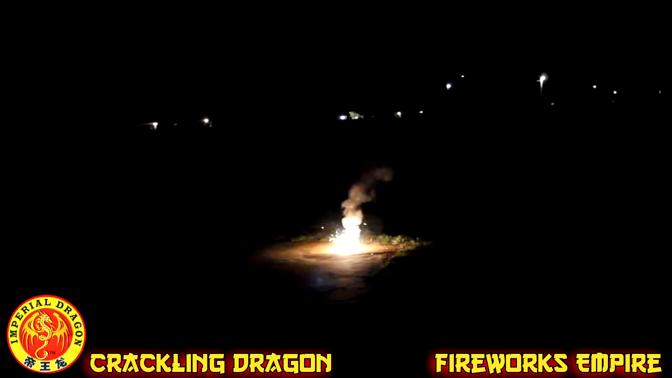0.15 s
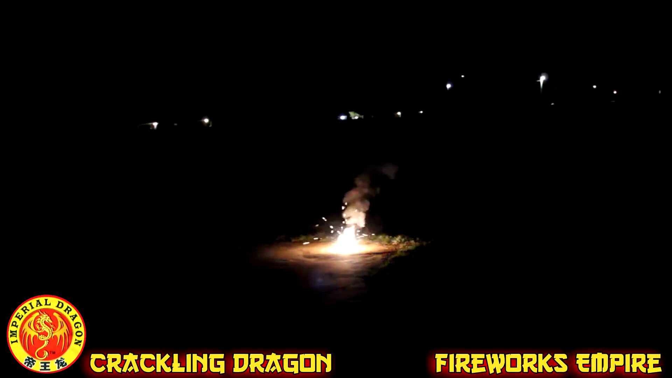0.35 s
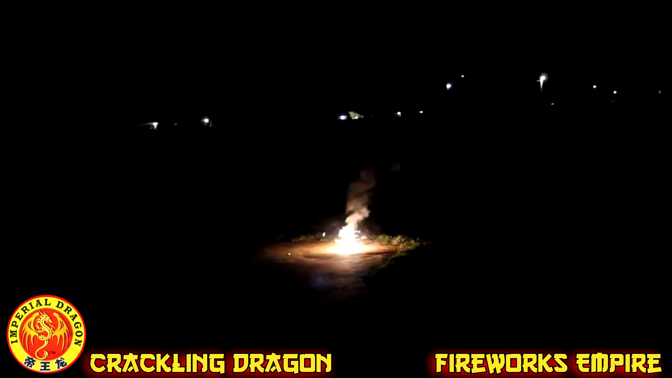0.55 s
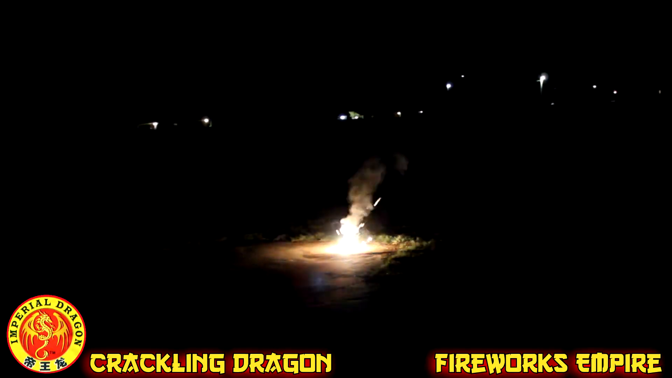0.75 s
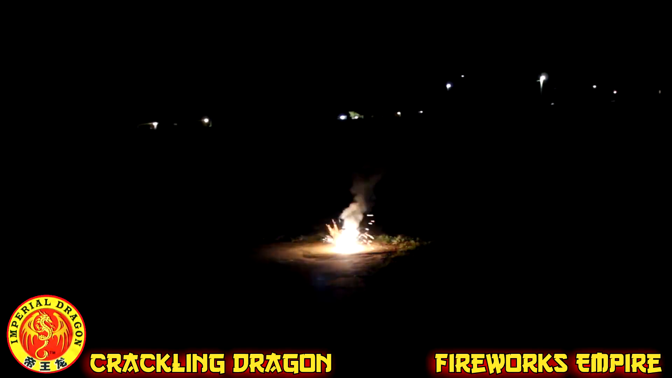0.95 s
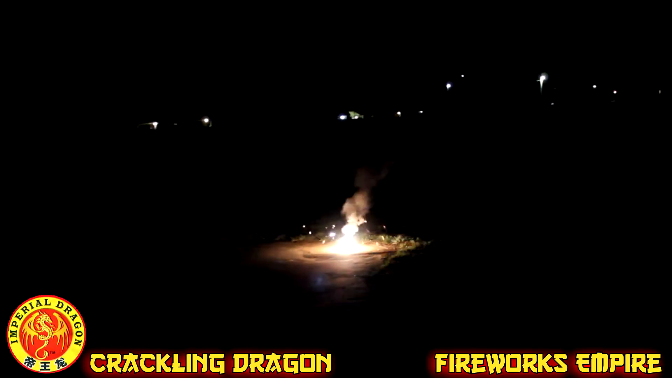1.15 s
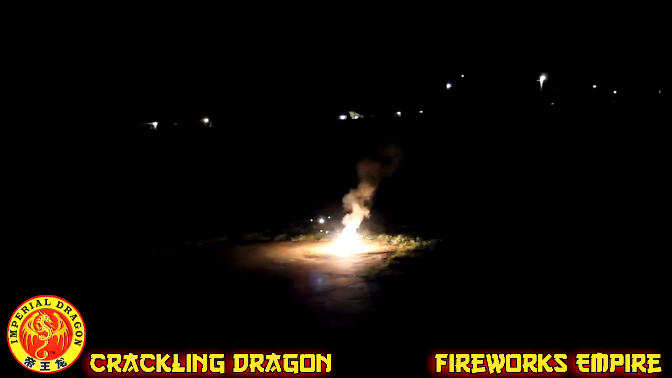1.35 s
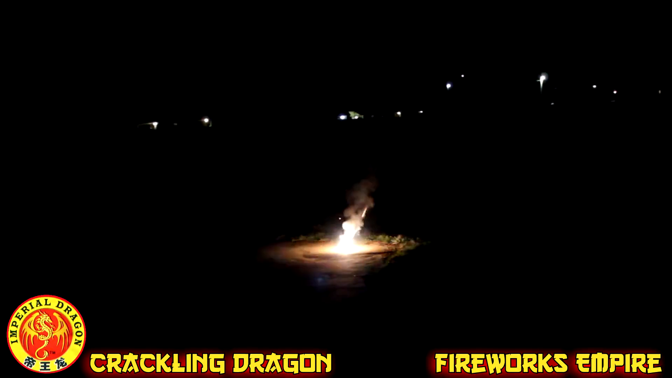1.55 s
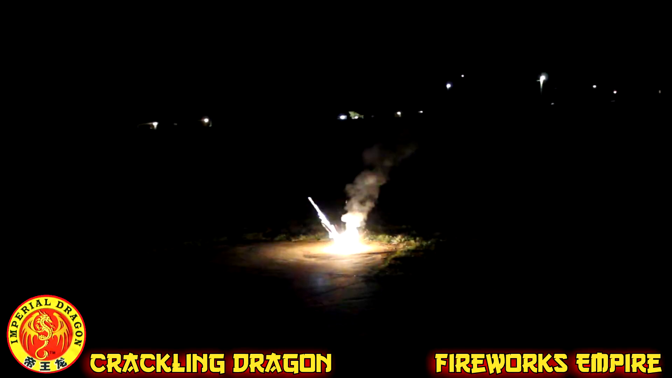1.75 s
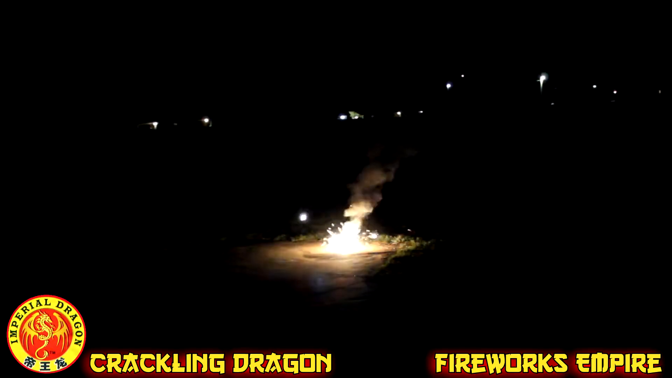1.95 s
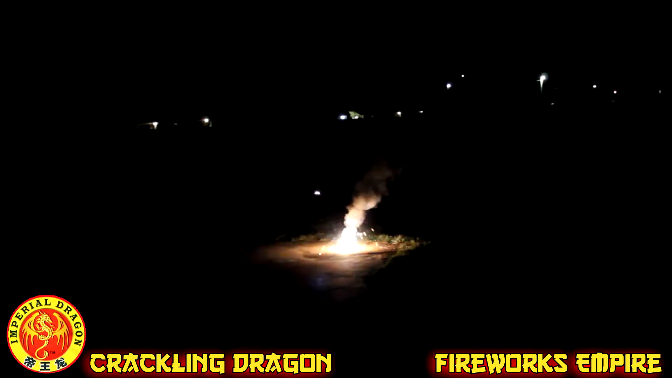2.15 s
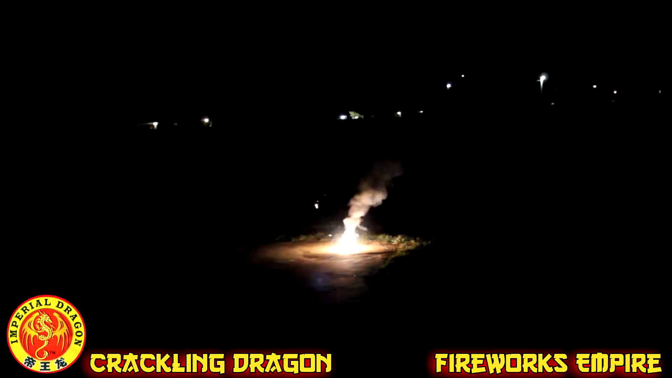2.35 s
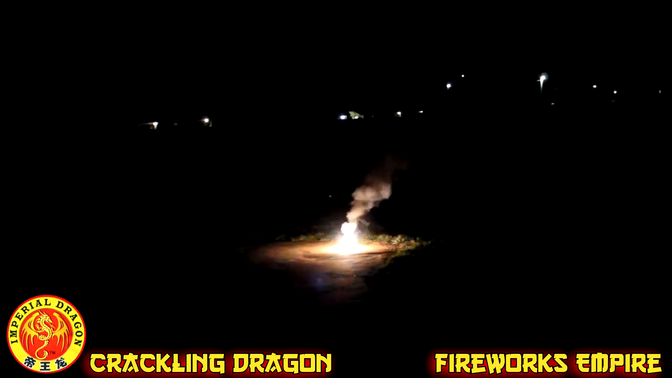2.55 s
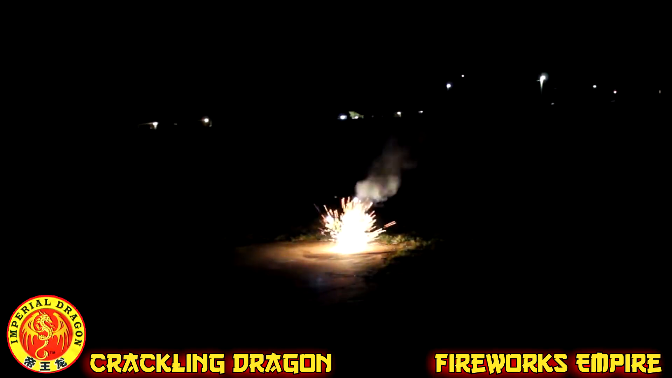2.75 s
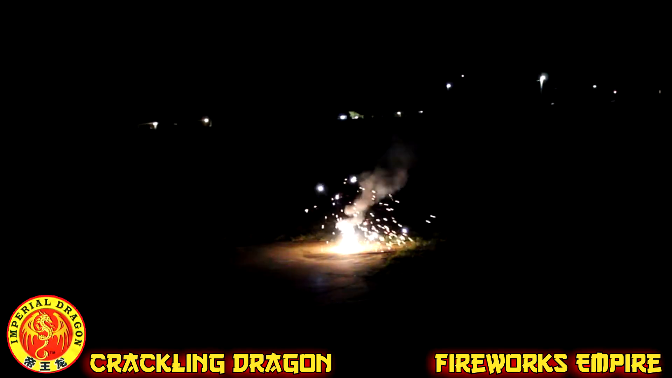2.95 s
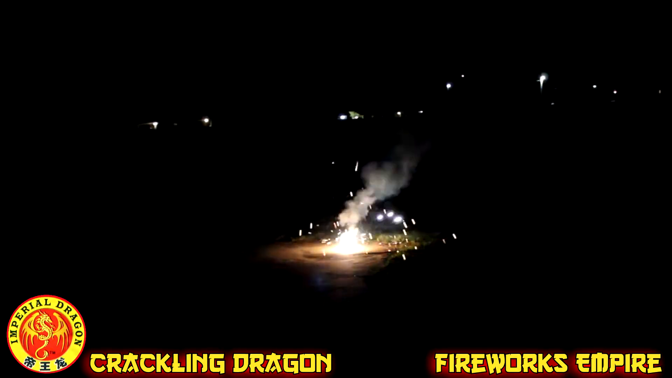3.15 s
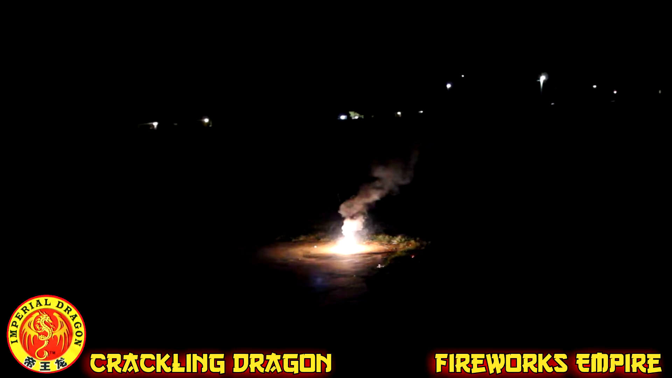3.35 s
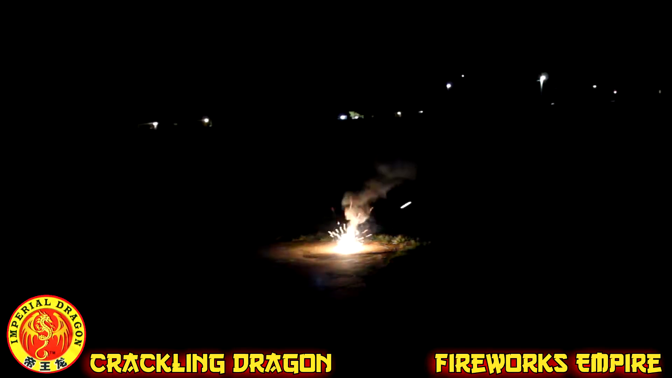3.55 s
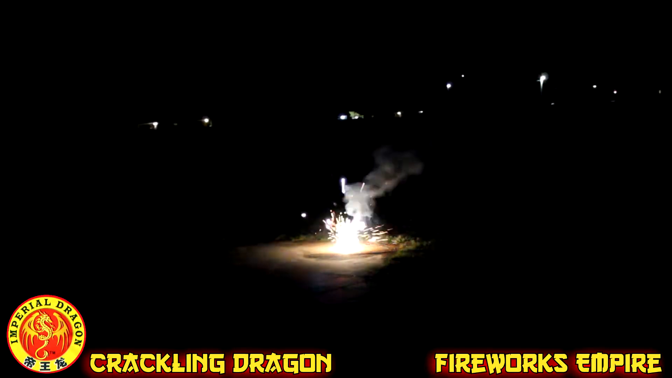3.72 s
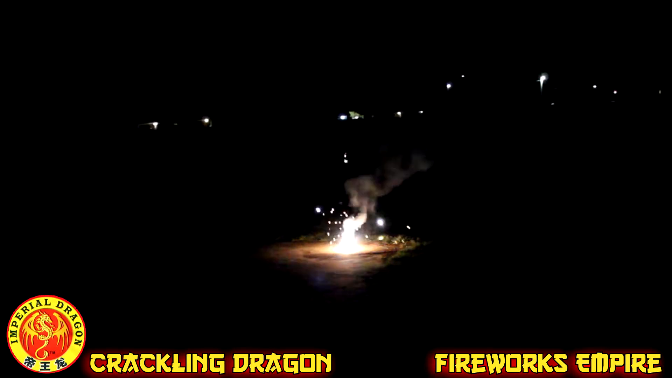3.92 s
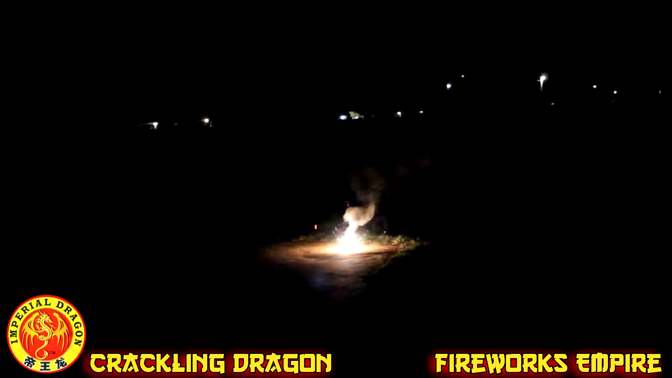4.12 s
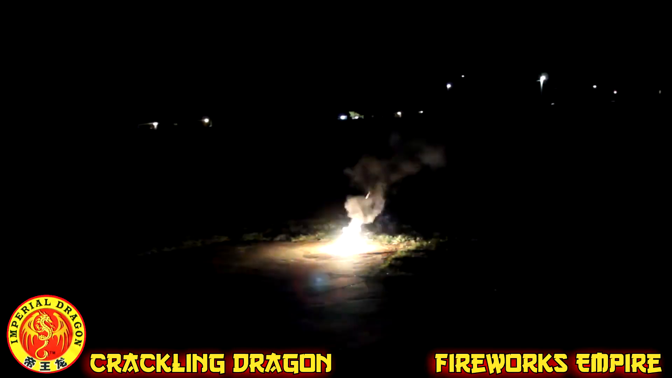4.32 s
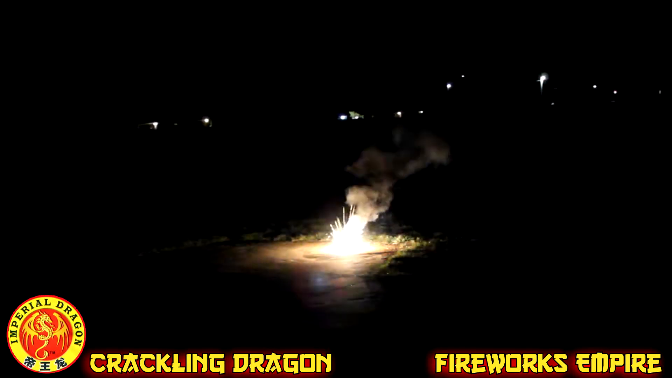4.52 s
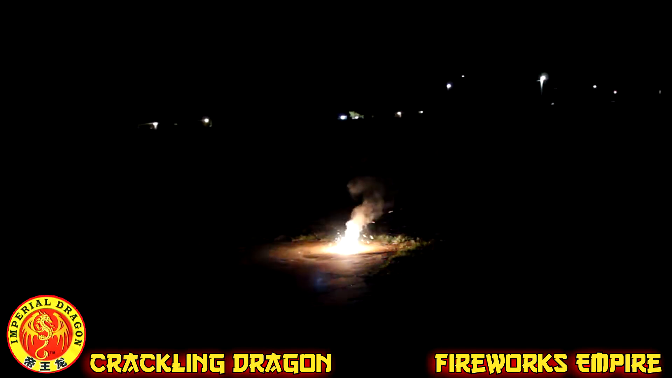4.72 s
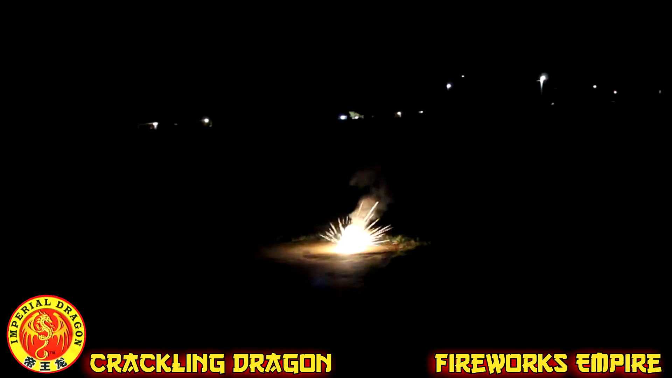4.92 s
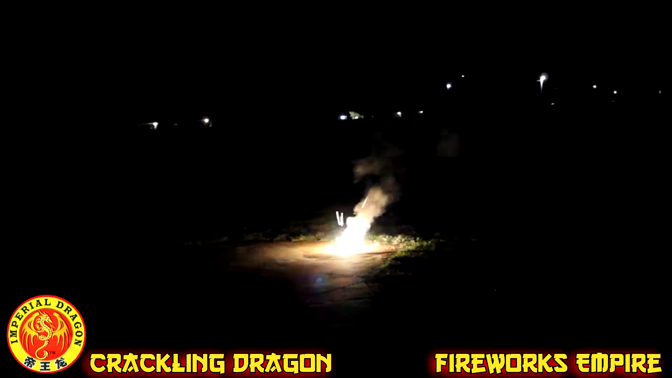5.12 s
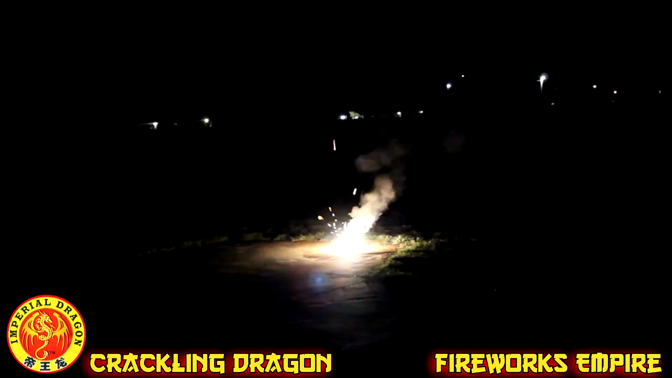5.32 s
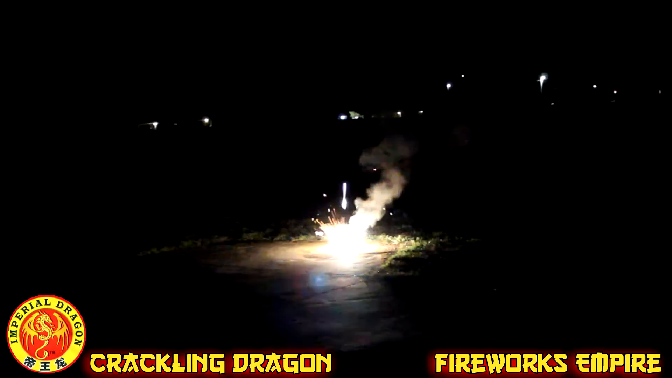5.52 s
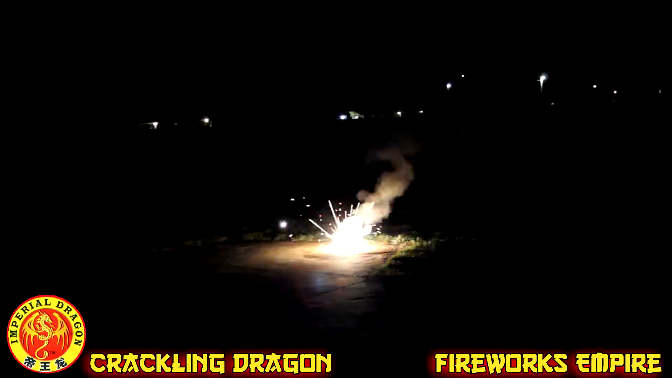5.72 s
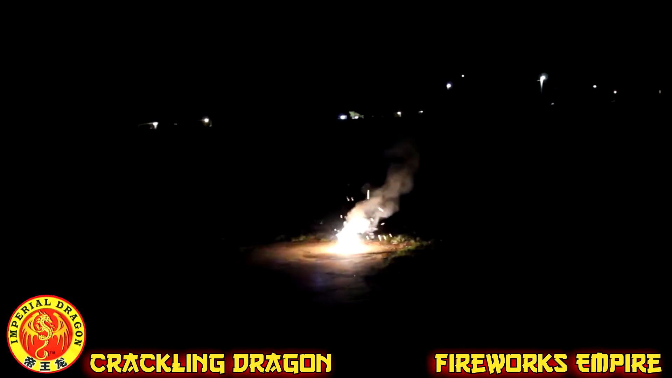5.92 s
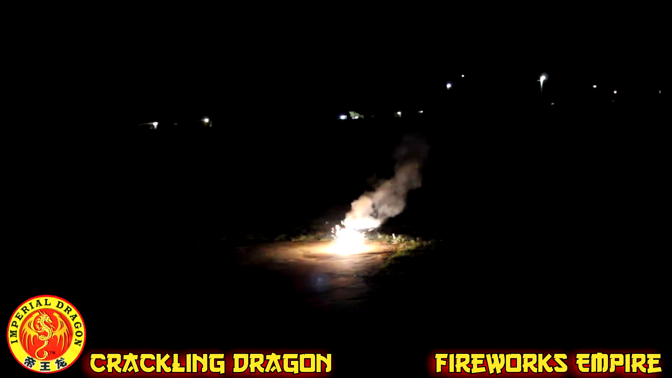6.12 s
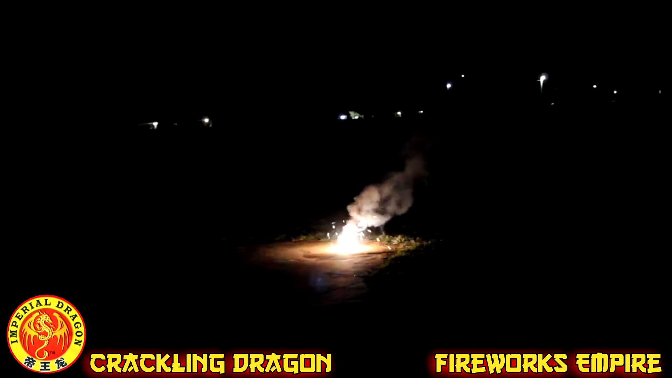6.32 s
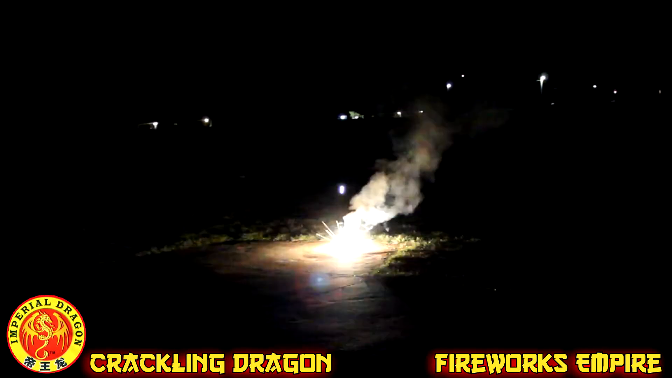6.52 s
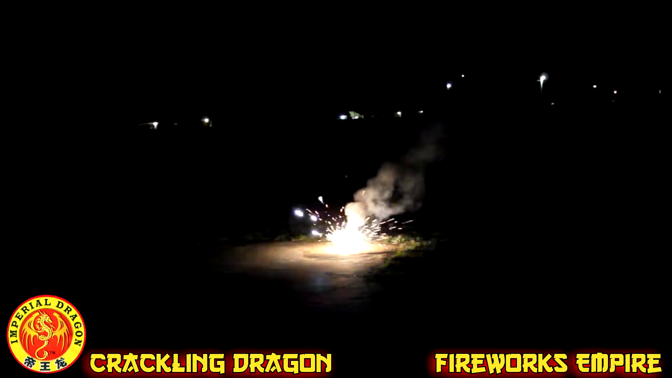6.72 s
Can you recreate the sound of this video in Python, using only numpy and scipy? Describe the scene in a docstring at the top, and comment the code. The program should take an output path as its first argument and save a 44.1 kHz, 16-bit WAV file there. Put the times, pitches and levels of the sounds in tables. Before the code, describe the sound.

Outdoors at night, a small ground firework crackles some metres from a phone microphone. Hard, clipped bangs of uneven loudness come singly and in quick clusters, each followed by a short gritty echo from surrounding walls and bushes. Between them are a soft hiss, brief fizzing sputters, tiny ticks, low rumble and a faint hum. The pops grow densest late on.

```python
"""Outdoors at night, some metres from a phone, a ground fountain firework crackles.
Each bursting star is a tiny blast wave with a ground bounce and a pull of air back into its fireball;
it overloads the microphone and returns from walls, fences and bushes as filtered noise bursts.
Banded noise gives the soft jet hiss and night rumble, a wavering sine the faint hum;
short gated noise bursts add fizz, filtered single clicks the ticks of stray grains."""
import sys
import numpy as np
from scipy import signal
from scipy.io import wavfile
from scipy.ndimage import uniform_filter1d

SR = 44100
rng = np.random.default_rng(int(sys.argv[2]) if len(sys.argv) > 2 else 0)


def inscribe(sig):
    """Save sig as 16-bit PCM at rate SR to the path in sys.argv[1].

    A 1-D sig is mono; a 2-D sig holds one channel per row.
    Samples are clipped to [-1, 1] before scaling.
    """
    pcm = np.round(np.clip(np.atleast_2d(sig).T, -1, 1) * 32767)
    wavfile.write(sys.argv[1], SR, pcm.astype(np.int16))


N = 302967  # length in samples


def undb(db):
    """Turn decibels into an amplitude factor."""
    return 10 ** (np.asarray(db) / 20)


def level(x, db):
    """Scale a signal to an RMS level in dB."""
    return x * undb(db) / np.sqrt(np.mean(x ** 2))


def band(x, hz, width_hz):
    """Resonant band-pass, gain 1 at the centre."""
    return signal.lfilter(*signal.iirpeak(hz, hz / width_hz, SR), x)


def walk(rate):
    """Random levels held for 1 / rate s and slewed twice; spread near 1."""
    hold = int(SR / rate)
    steps = np.repeat(rng.standard_normal(N // hold + 1), hold)
    slewed = uniform_filter1d(uniform_filter1d(steps, hold), hold)
    return 1.3 * slewed[:N]


# spectrum of jet and night air: (f/Hz, relative level/dB per Hz)
NIGHT_SPECTRUM = [(25, -24), (45, 8.5), (110, 0), (200, -7.5), (400, -12), (2800, -21.5), (5500, -34),
                  (9400, -35.5), (12000, -39), (15500, -34)]
# burn strength of the jet, in full above 600 Hz and less below: (t/s, relative level/dB)
JET_BURN = [(0, 8), (.6, -2), (1.8, 2.5), (3.0, -3), (4.0, 0), (5.3, -1.5), (6.3, -1.5), (6.87, -1)]
NIGHT_DB = -48  # RMS of the whole bed


def night():
    """Half-octave noise bands: all flicker, and the hiss of the jet follows its burn."""
    f, shape_db = np.transpose(NIGHT_SPECTRUM)
    burn_db = np.interp(np.arange(N) / SR, *np.transpose(JET_BURN))
    bed = 0
    for hz in 30 * 2 ** np.arange(0, 9.1, .5):
        noise = band(band(rng.standard_normal(N), hz, hz / 2), hz, hz / 2)
        flicker_db = 1.5 * walk(9)
        colour_db = np.interp(np.log(hz), np.log(f), shape_db)
        jet_share = min(hz / 600, 1)
        bed = bed + undb(colour_db + flicker_db + burn_db * jet_share) * noise
    return level(bed, NIGHT_DB)


HUM_HZ, HUM_DB, HUM_WAVER_DB = 239, -57.5, 0.5


def hum():
    """A low sine that wavers in level and a little in pitch."""
    hz = HUM_HZ + 1.8 * walk(8)
    tone = np.sin(2 * np.pi * np.cumsum(hz) / SR)
    return level(undb(HUM_WAVER_DB * walk(22)) * tone, HUM_DB)


BLAST_MS, BLAST_FALL = 0.13, 1.15  # time to the zero crossing; decay rate per BLAST_MS


def blast(t_ms):
    """Shock front one sample wide, quick fall through zero and a short underpressure."""
    u = np.maximum(t_ms, 0) / BLAST_MS
    front = np.clip(t_ms * SR / 1000 + .5, 0, 1)
    return front * (1 - u) * np.exp(-BLAST_FALL * u)


# hard edges next to the phone: (lag t/ms, level/dB against the direct blast)
CLOSE_EDGES = [(0.436, -19.5), (0.748, -14.5)]
BOUNCE_DB = -4  # ground bounce against the direct blast
NEAR_MS, NEAR_SPREAD_MS, NEAR_DB = 0.347, 0.41, -15.5  # one near reflection, its lag differs per burst
SUCTION_MS, SUCTION_DB = 0.48, -13  # base time to the deepest pull, base depth
SUCTION_GROWTH = 0.065  # dB of time stretch per dB above 0: bigger fireballs pull for longer


def star(late_ms, db, suction_db, lag_ms, place):
    """Blast, ground bounce, near reflections and the slower pull of air into the cooling fireball."""
    t = np.arange(256) * 1000 / SR - late_ms
    pull_ms = SUCTION_MS * undb(SUCTION_GROWTH * max(db + suction_db, 0))
    u = np.maximum(t - BLAST_MS, 0) / pull_ms
    pull = undb(SUCTION_DB + suction_db) * np.e * u * np.exp(-u)  # np.e makes the swell peak at 1
    near_ms = NEAR_MS + NEAR_SPREAD_MS * place
    paths = [(0, 0), (lag_ms, BOUNCE_DB), (near_ms, NEAR_DB)] + CLOSE_EDGES
    pressure = sum(undb(path_db) * blast(t - path_ms) for path_ms, path_db in paths)
    return undb(db) * (pressure - pull)


# things that throw a pop back: (delay t/ms, t60 t/ms, centre f/Hz, width f/Hz,
#                               level/dB of the scatter before its swell and decay)
REFLECTING_THINGS = [(.8, 16.4, 6050, 5000, -30), (1.4, 47, 1460, 3150, -28.5), (5.1, 21, 2030, 6000, -28),
                     (5.67, 27, 910, 2200, -46.5), (10.3, 29, 6300, 4500, -42),
                     (10.3, 82, 1040, 3200, -34.5), (21.63, 16.6, 4000, 3100, -30),
                     (22.3, 55, 1990, 2700, -33), (31.4, 54, 980, 1600, -31), (40.1, 54, 910, 3100, -31),
                     (43.4, 71, 240, 650, -39), (55, 75, 2800, 5600, -40), (47, 195, 1370, 2770, -39),
                     (70.7, 64, 1160, 1100, -35.5), (85.7, 57, 510, 350, -46),
                     (105.6, 78, 2800, 2500, -36.5), (109.3, 66, 8500, 3100, -48),
                     (123, 29, 5000, 1500, -37.5), (131, 126, 680, 2500, -47.5),
                     (149.8, 60, 1340, 2200, -48.5), (8, 620, 1280, 2220, -47), (8, 250, 3300, 4900, -51),
                     (4.07, 324, 240, 285, -42.5)]
GRIT_DB = 3.5  # scale of the random boost of the single facets of a reflector
RISE_PER_DELAY, RISE_PER_T60 = 0.022, 0.018  # ms per ms: far and deep reflectors swell more slowly
AIR_HZ = 14100  # the long way round dulls the very top of every echo


def surroundings():
    """Answer to one click: each reflector scatters a gritty burst of its own colour."""
    t = np.arange(SR // 2) * 1000 / SR
    answer = 0
    for delay, t60, hz, width_hz, db in REFLECTING_THINGS:
        u = np.maximum(t - delay, 0)
        rise = RISE_PER_DELAY * delay + RISE_PER_T60 * t60
        swell = 1 - np.exp(-(u / rise) ** 2)
        decay = np.exp(-np.log(1000) * u / t60)
        noise = rng.standard_normal(len(t))
        facets = noise * undb(GRIT_DB * np.minimum(rng.exponential(size=len(t)), 4))
        coloured = band(band(facets, hz, width_hz), hz, 2 * width_hz)
        answer = answer + swell * decay * level(coloured, db)
    return signal.sosfilt(signal.butter(6, AIR_HZ, fs=SR, output="sos"), answer)


# bursting stars, some in close pairs; the first row is a faint noise wash before the first bang:
# (t/s, blast level/dB, echo send level/dB against the blast,
#  suction level/dB on top of SUCTION_DB, ground bounce lag t/ms)
BURSTS = [(0.0084, -21, 8.5, -1, .07), (0.029, 14.5, -1.5, 0, .15), (0.288, -1.5, -12.5, -6.5, .11),
          (0.3719, 7, -9.5, -11, 0.095), (0.4668, -5.5, -9, -6.5, 0.093), (0.5209, -24, -1, 1, .09),
          (0.6728, -23.5, -12, 4, 0.091), (0.7123, -15.5, -10, 4, 0.074), (0.7588, -15, -9, -7, 0.062),
          (0.7936, 1, -11, -6.5, 0.083), (0.8267, -9, -17, -13, 0.087), (0.9066, -6, -12, -3.5, 0.077),
          (0.9669, -27, -8, 6, .11), (1.0254, 13, -2.5, 2, 0.093), (1.2976, 12, 1, 0, .14),
          (1.4778, -27.5, -9, 8.5, 0.13), (1.61, 6, -10.5, -10.5, .11), (1.8405, 11, 0.5, 1.5, 0.16),
          (1.8409, 9, -23, -20, 0.045), (1.9111, 3, -9, -18, 0.088), (1.9465, 10.5, -10, -8.5, 0.11),
          (1.9558, -6, -14, 1, .02), (1.9987, 5.5, -3, 2, 0.082), (2.0179, -8, -12, -6, .11),
          (2.3241, 6.5, -6.5, -7, 0.082), (2.6082, -23, -8, 3, .07), (2.7217, -21.5, -13, -9, 0.096),
          (2.7763, 16, 0, 1.5, .11), (3.1249, 5.5, 0, 4, 0.11), (3.1253, 4, -25, -15, 0.075),
          (3.1951, 10.5, 2.5, -1, .11), (3.377, -27, -8, -1, .055), (3.5753, 5.5, -7, 0, 0.075),
          (3.6799, 9, -13, -20, 0.19), (3.68044, 0.5, -19, -20, 0.021), (3.7422, 8.5, 0.5, -2, 0.18),
          (3.7484, 17.5, 0, -1, .14), (4.1207, 11, -3.5, 2.5, 0.096), (4.3314, -18, -8, -12, .09),
          (4.3351, -9.5, -12, -3, 0.091), (4.4178, -20.4, -7, -2, 0.076), (4.4701, -21.5, -11, 0, .11),
          (4.4775, -25, -15, 2, .09), (4.4935, -9.5, -9, -13, 0.088), (4.5416, -11, -6, -4, 0.094),
          (4.6078, 10, -11.5, -9.5, 0.095), (4.7489, -23, -10, -6, 0.052), (4.8532, -28, -3, 7, 0.077),
          (4.9162, -24.5, -3, 7, 0.081), (5.0, 12, 1, 0, .13), (5.179, -4.5, -11.5, -13, 0.096),
          (5.2107, -22, -14, 5, 0.059), (5.3022, -0.5, -10, -8, .1), (5.3243, 5, -7, -9, .12),
          (5.3832, -13, -7, -13, 0.099), (5.3928, -15, -13, -9, .09), (5.4216, -23, 4, 4, .11),
          (5.5175, -1, -12, -8, 0.092), (5.5831, 11.5, -4.5, 0, 0.11), (5.592, 9.5, -3, 1, 0.09),
          (5.6169, 11, -3.5, 3, .13), (5.6331, 6, -19, -10, 0.14), (5.6602, 11, -2.5, -4.5, 0.13),
          (5.8154, 7, -6.5, -9, .11), (5.8752, 15.5, 0.5, -1, 0.13), (5.969, 12.5, -10, -6, .2),
          (6.1245, -15.5, -2, 0, 0.055), (6.1955, -32.5, 6, -2, 0.19), (6.4566, -30.5, -2, 8, 0.086),
          (6.5236, 6.5, -8, -4, 0.077), (6.6188, 2.5, -10.5, -18, 0.096), (6.699, -20.2, 2, -3, .09),
          (6.7145, 10, 0.5, 4, .14), (6.7233, 16, -1, 2.5, 0.1), (6.8258, 16.5, -4.5, -4, 0.14),
          (6.8504, -0.5, -15, -18, .09)]
SHARED = 0.96  # share of echo power alike for all bursts; the rest has one pattern per group of bursts


def crackle(places=3):
    """Every burst is heard directly and again through the surroundings; groups take turns."""
    direct, sent = np.zeros(N + 256), np.zeros((places, N))
    near_places = rng.random(len(BURSTS))
    for k, (s, db, echo_db, suction_db, lag_ms) in enumerate(BURSTS):
        i = int(s * SR)
        late_ms = (s * SR - i) * 1000 / SR  # the part of a sample left over
        direct[i:i + 256] += star(late_ms, db, suction_db, lag_ms, near_places[k])
        sent[k % places, i] += undb(db + echo_db)
    echo = np.sqrt(SHARED) * signal.fftconvolve(sent.sum(0), surroundings())[:N]
    for clicks in sent:
        echo += np.sqrt(1 - SHARED) * signal.fftconvolve(clicks, surroundings())[:N]
    return direct[:N] + echo


SPARKS_PER_S = 12
SPARK_DB, SPARK_SPREAD_DB = -42, 5  # least click level before filtering, scale of the random boost


def sparks():
    """Faint thin ticks of single grains, at random: clicks through two treble resonances."""
    gap, boost = -np.log(1 - rng.random((400, 2))).T  # exponential draws
    i = (np.cumsum(gap) / SPARKS_PER_S * SR).astype(int)
    db = SPARK_DB + np.minimum(SPARK_SPREAD_DB * boost, 10)
    ticks = np.zeros(N)
    ticks[i[i < N]] = undb(db[i < N])
    return band(band(ticks, 8200, 8000), 8300, 9000)


# short gated noise bursts; the one at 3.70 is faint noise leading up to a bang:
# (t/s, length t/ms, body level/dB)
NOISE_BURSTS = [(.521, 31, -44), (0.673, 10, -45), (.75, 23, -50), (0.798, 15, -38.5), (0.829, 19, -41),
                (0.909, 10, -39.5), (.946, 21.4, -45), (1.478, 20.5, -41), (1.677, 8.9, -43),
                (3.033, 24, -52), (3.70, 40, -49), (4.06, 10, -48), (4.336, 22, -47.5), (4.42, 23, -44.5),
                (4.496, 12, -42), (4.543, 18, -35.5), (4.682, 26, -41.5), (4.854, 18, -47),
                (4.911, 21, -44.5), (5.187, 15, -36.5), (5.304, 4.9, -33), (5.422, 19, -38),
                (5.661, 2.5, -13), (5.9698, 2.4, -13), (6.052, 11, -40), (6.145, 31, -44), (6.197, 24, -49)]
FIZZ_TREBLE_DB, FIZZ_SHARP_MS = -10.5, 3.1  # hiss of a long burst against its body; short ones are brighter


def fizz():
    """Rough noise bursts that start and stop abruptly: a dull body under a bright hiss."""
    t, body, top = np.arange(N) / SR, np.zeros(N), np.zeros(N)
    for s, ms, db in NOISE_BURSTS:
        from_edge_s = np.minimum(t - s, s + ms / 1000 - t)
        gate = undb(db) * np.clip(from_edge_s / 0.0019, 0, 1)
        body += gate
        top += undb(FIZZ_TREBLE_DB) * (1 + FIZZ_SHARP_MS / ms) ** 2 * gate
    sputter = rng.standard_normal(N) * undb(3 * walk(900))
    dull = level(band(band(sputter, 910, 2200), 1000, 3300), 0)
    bright = level(band(band(sputter, 5500, 11000), 6500, 14000), 0)
    return body * dull + top * bright


def scene():
    """Crackle, fizz and ticks over the night air, jet and hum, in mono."""
    return (crackle() + fizz() + sparks() + night() + hum())[None]


# resonances of port and capsule, added to the plain sound: (f/Hz, width f/Hz, level/dB)
MIC_RESONANCES = [(2900, 2380, -4.5), (8940, 4940, 1.5)]
MEMBRANE_DB = 11.5  # swing at which the membrane stiffens
MIC_LOW_HZ, MIC_LOW_DAMP, MIC_HIGH_HZ = 77.4, 1.23, 11640  # low corner, its damping ratio, high corner
TOP_HZ = 16300  # steep final cut


def record(dry):
    """The capsule rings, stiffens on blasts and loses both ends; the converter clips; the top is cut."""
    x = dry + sum(undb(db) * band(dry, hz, width_hz) for hz, width_hz, db in MIC_RESONANCES)
    x = undb(MEMBRANE_DB) * np.tanh(x / undb(MEMBRANE_DB))
    w = 2 * np.pi * MIC_LOW_HZ
    low_cut = signal.bilinear([1, 0, 0], [1, 2 * MIC_LOW_DAMP * w, w * w], SR)
    x = signal.lfilter(*low_cut, x)
    x = signal.sosfilt(signal.butter(2, MIC_HIGH_HZ, fs=SR, output="sos"), x)
    clipped = np.clip(x, -1, 1)
    x = signal.sosfilt(signal.ellip(8, .2, 70, TOP_HZ, fs=SR, output="sos"), clipped)
    return np.clip(x, -1, 1)


dry = scene()
out = record(dry)
inscribe(out)
```